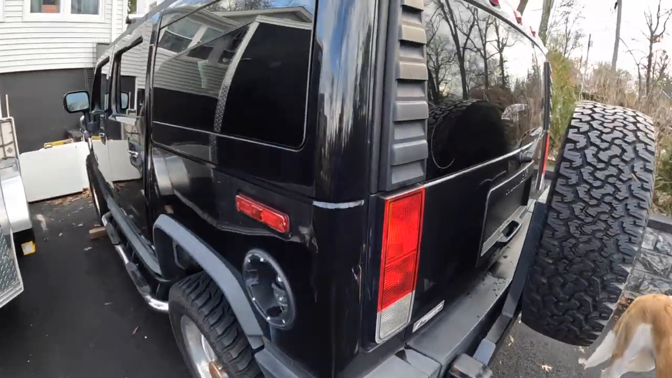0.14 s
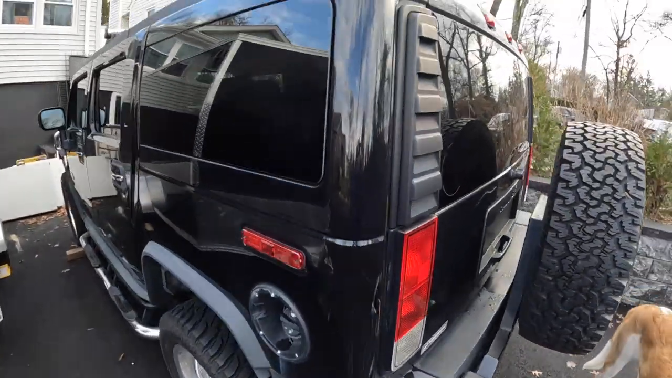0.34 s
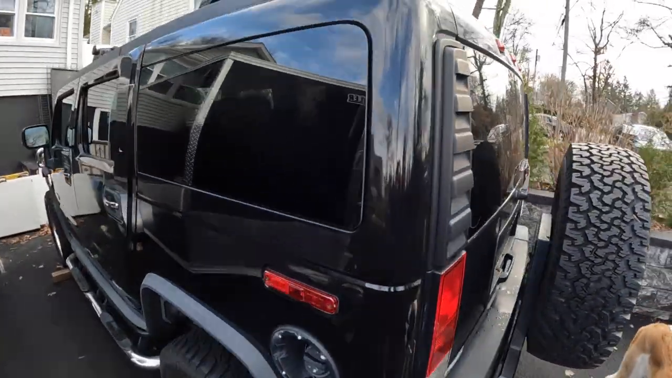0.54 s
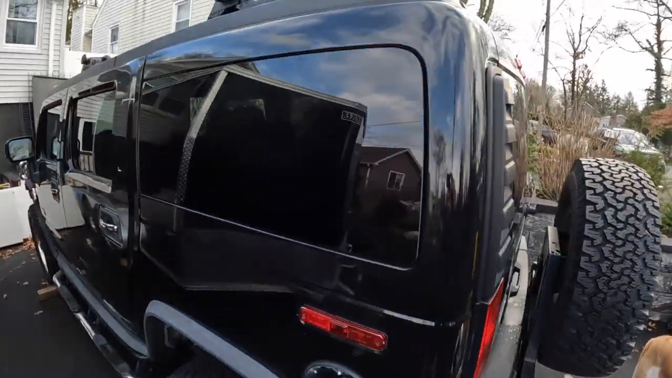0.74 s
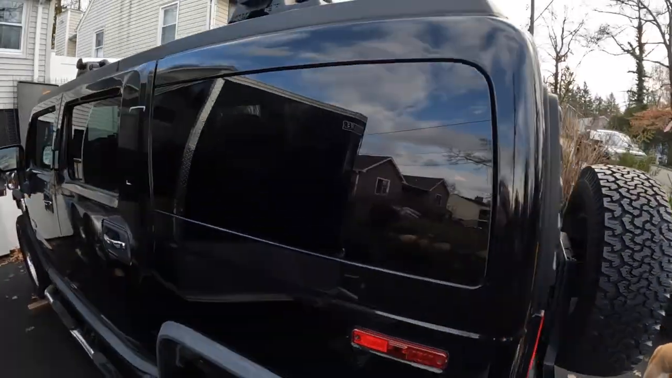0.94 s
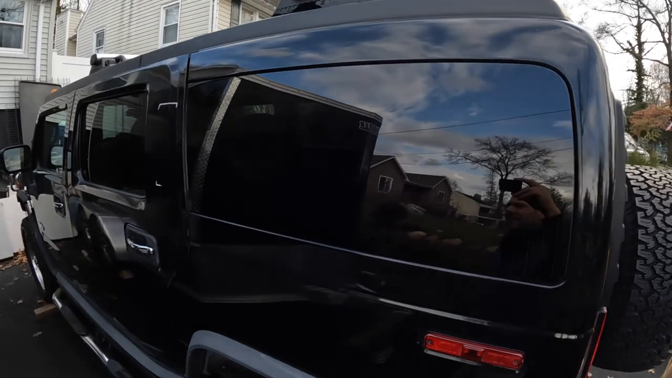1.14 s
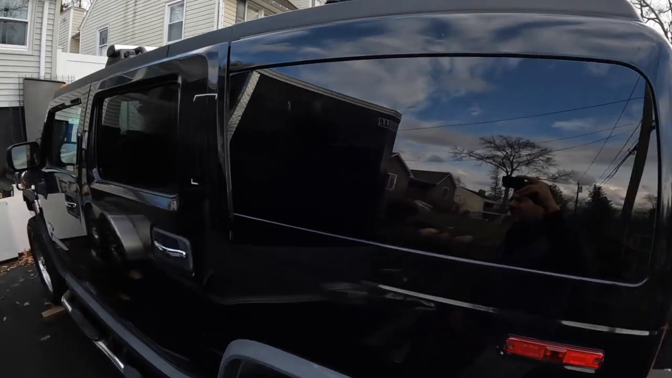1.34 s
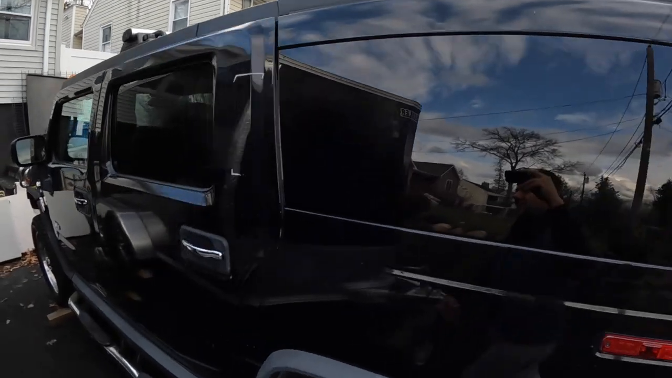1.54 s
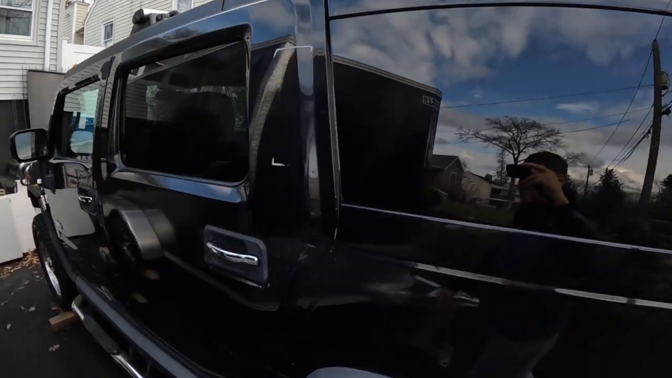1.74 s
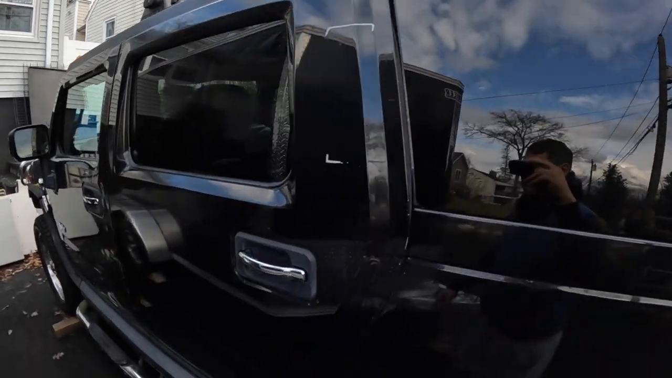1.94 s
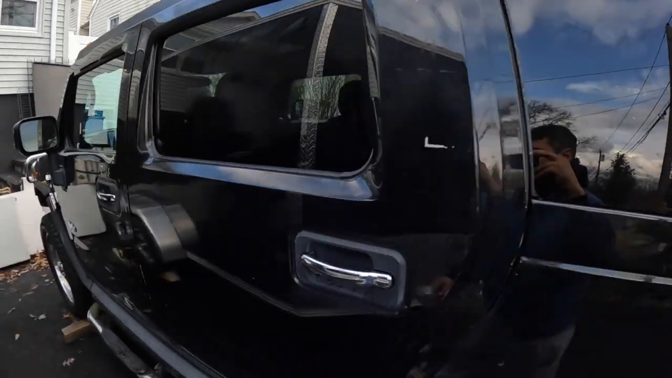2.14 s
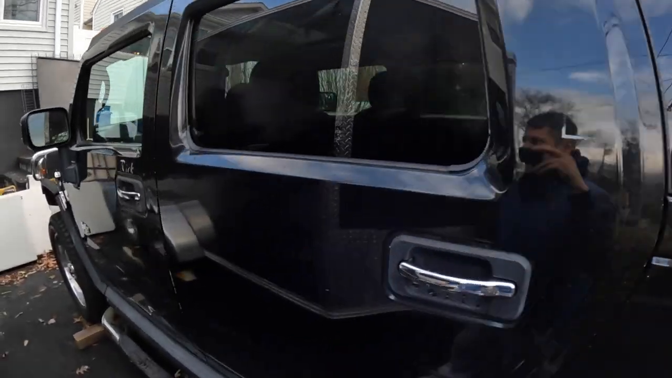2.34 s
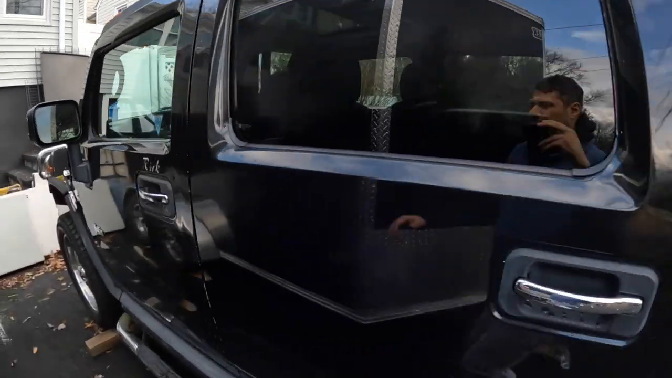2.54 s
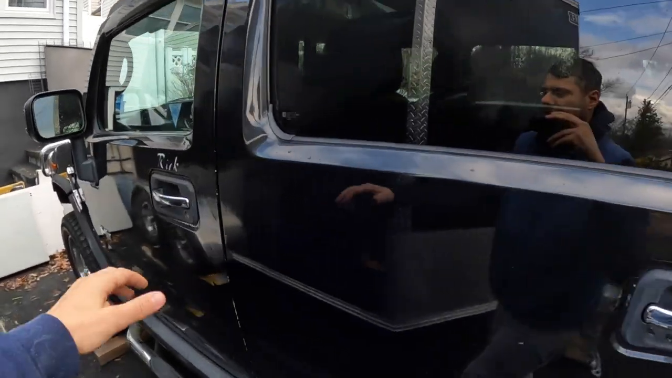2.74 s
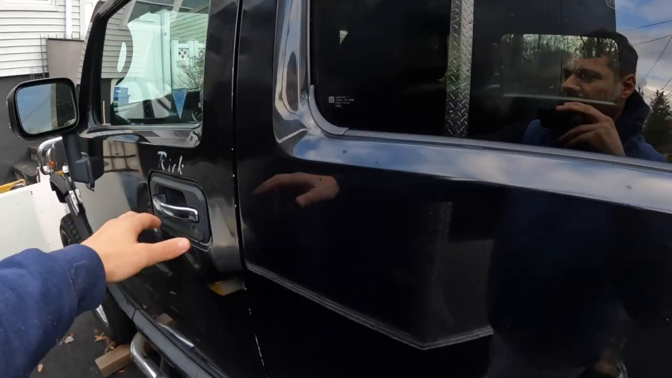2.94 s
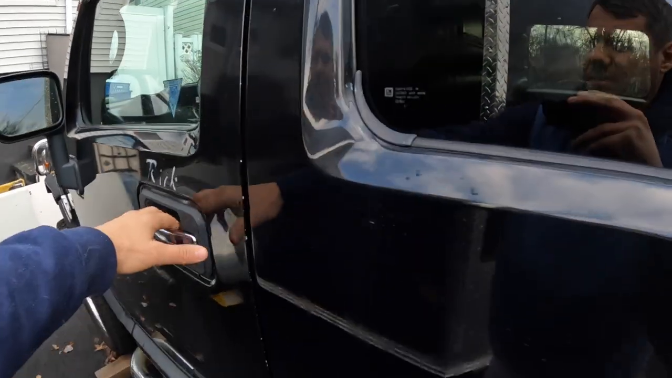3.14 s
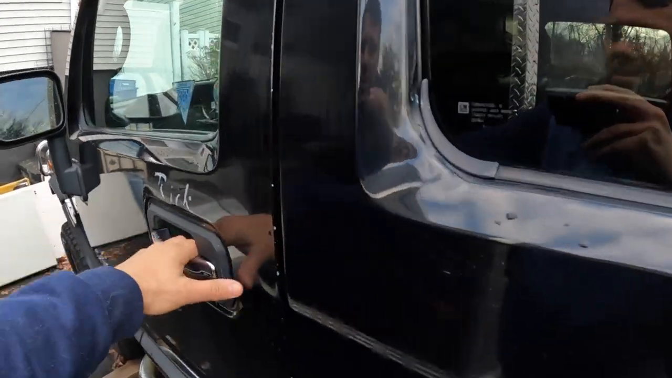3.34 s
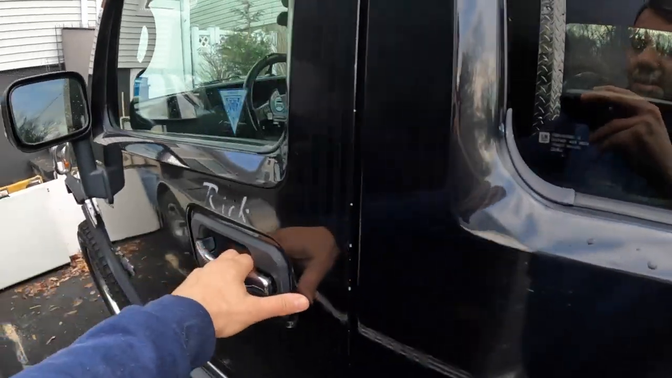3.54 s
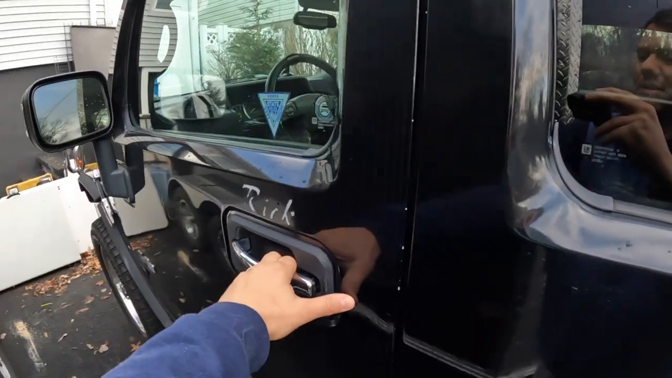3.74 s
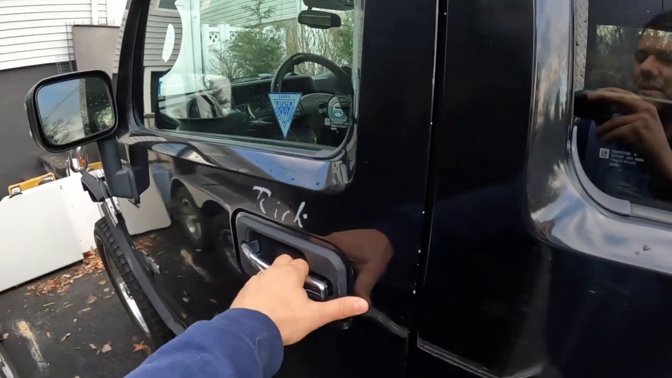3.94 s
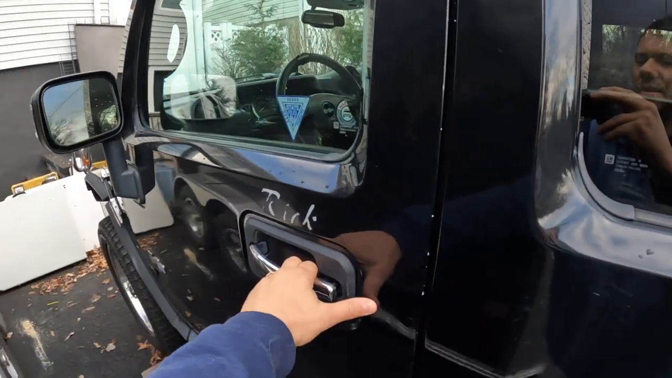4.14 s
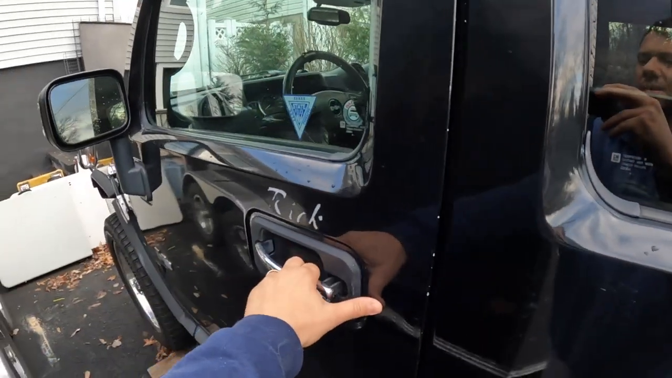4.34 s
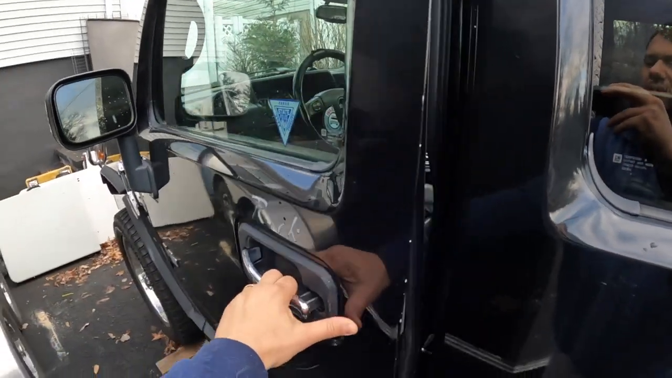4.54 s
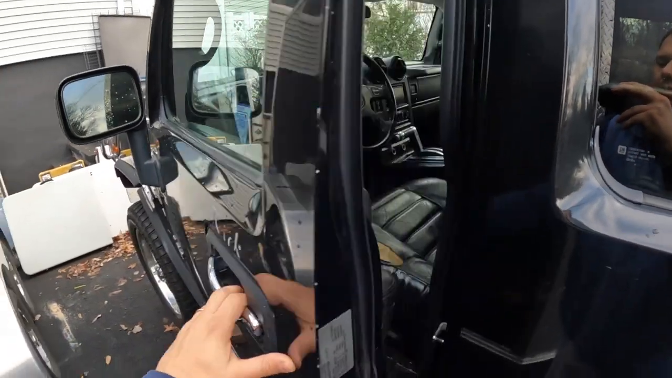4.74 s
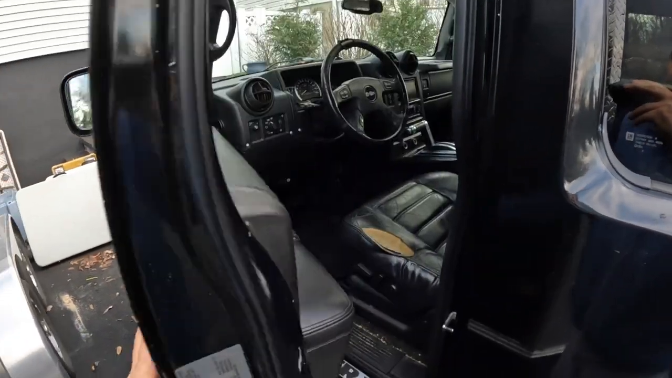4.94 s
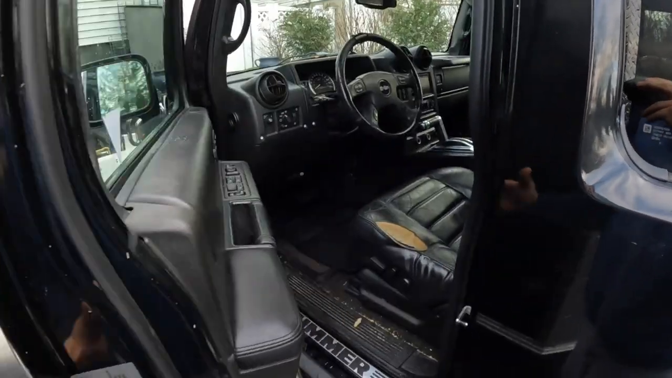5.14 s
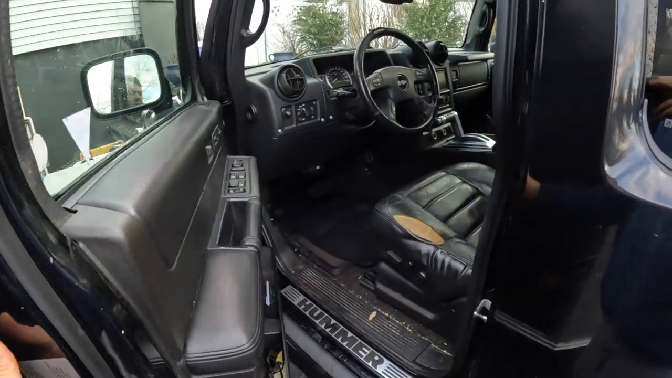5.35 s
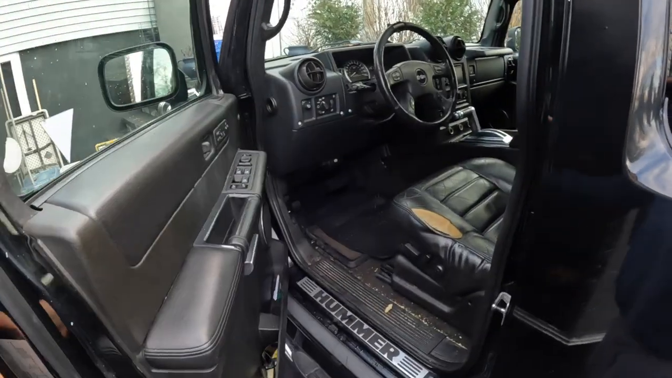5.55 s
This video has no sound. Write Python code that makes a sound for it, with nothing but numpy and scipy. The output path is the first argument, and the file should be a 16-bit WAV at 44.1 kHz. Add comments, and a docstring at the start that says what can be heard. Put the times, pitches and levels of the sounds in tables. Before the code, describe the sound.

Shoes scuff over a gritty driveway before a heavy car door opens with a dull clunk, a sharp latch clunk and a light knock.

```python
"""The door of a heavy off-road vehicle opens after a short walk over a gritty driveway.
Soles scuff, stones snap and a sleeve rustles, over outdoor rumble, far traffic and a brief, faint hum.
The handle is pulled against its stop with a dull clunk, the latch lets go with a sharp one, the door
booms as it leaves its seal, and the door check knocks into its notch as it swings open.
Knocks ring decaying modes and noise bands; rubbing is coloured noise that swells with each stroke."""
import sys
import numpy as np
from scipy import signal
from scipy.io import wavfile

SR = 44100
rng = np.random.default_rng(int(sys.argv[2]) if len(sys.argv) > 2 else 0)


def wav_out(sig):
    """Save sig, one row per channel (or a flat mono array), as 16-bit PCM at SR to the path in sys.argv[1]."""
    wavfile.write(sys.argv[1], SR, np.round(np.clip(np.atleast_2d(sig).T, -1, 1) * 32767).astype(np.int16))


N = 246166
TIME = np.arange(N) / SR
RING_SAMPLES = 26000
RING_TIME = TIME[:RING_SAMPLES]

# arm swings, which pace the jacket and the fine grit: (fastest moment [s], level [dB], half length [s])
ARM_SWINGS = [(0.04, -68, 0.17), (0.41, -66, .13), (1.03, -65, 0.28), (1.34, -63.5, .085),
              (1.77, -69.5, 0.1), (2.4, -68, .22), (2.86, -62, 0.3), (3.36, -73, 0.041),
              (3.5, -61.5, 0.026), (3.62, -67.5, 0.087), (3.86, -80, 0.093), (4.39, -58.5, 0.034),
              (4.85, -59, 0.1), (5.14, -66, 0.14)]


def from_db(db):
    """Decibels to gain."""
    return 10 ** (np.asarray(db) / 20)


def rms_one(x):
    """Scale to unit rms."""
    return x / np.sqrt(np.mean(x ** 2) + 1e-20)


def in_time(rows):
    """Each column of a curve at every sample."""
    s, *columns = np.transpose(rows)
    return [np.interp(TIME, s, c) for c in columns]


def at_hz(rows, hz):
    """Each column of a spectrum at one frequency."""
    freqs, *columns = np.transpose(rows)
    return [np.interp(np.log(hz), np.log(freqs), c) for c in columns]


def add(out, s, sound):
    """Mix a short sound in at time s."""
    start = max(round(s * SR), 0)
    part = sound[..., :max(N - start, 0)]
    out[..., start:start + part.shape[-1]] += part


def soften(x, hz):
    """Two-pole low-pass."""
    return signal.sosfilt(signal.butter(2, min(hz, SR * .45), fs=SR, output="sos"), x + 1e-18)


def thin(x, hz):
    """Two-pole high-pass."""
    sos = signal.butter(2, np.clip(hz, 15, SR * .45), "high", fs=SR, output="sos")
    return signal.sosfilt(sos, x + 1e-18)


def noise_bands(size):
    """Yield (centre Hz, stereo noise) in narrow bands, centred in the bass and wider in the treble."""
    # stereo image: (frequency [Hz], left-right correlation [0-1])
    likeness = [(30, 0.9), (70, 1), (120, 1), (400, 0.96), (1000, 0.77), (3000, 0.59), (7000, 0.78),
                (13000, 0.3)]
    # stereo lean: (frequency [Hz], left minus right [dB])
    balance = [(100, -0.65), (400, 1), (1300, 1.6), (2500, 1), (5000, 0.1), (9000, 1), (13000, 7)]
    edges = [*np.geomspace(18, 4000, 21), 5000, 6400, 8000, 9700, 11500, 13100, 16000]
    white = rng.standard_normal((2, 2, size + 8000))
    sides = np.array([[1], [-1]])
    for k, (low, high) in enumerate(zip(edges, edges[1:])):
        bandpass = signal.butter(3, [low, high], "band", fs=SR, output="sos")
        mid, side = signal.sosfilt(bandpass, white[k % 2])[:, -size:]
        hz = np.sqrt(low * high)
        alike = np.clip(at_hz(likeness, hz)[0], 0, 1)
        pair = np.sqrt(1 + alike) * mid + np.sqrt(1 - alike) * side * sides
        yield hz, rms_one(pair) * from_db(sides * at_hz(balance, hz)[0] / 2)


def coloured(bands, spectrum):
    """Noise bands summed to the shape of a spectrum, at unit rms."""
    return rms_one(sum(band * np.sqrt(hz) * from_db(at_hz(spectrum, hz)[0]) for hz, band in bands))


def strokes(rows):
    """Envelope of a rub that speeds up and slows down in each stroke; strokes add in power."""
    powers = (from_db(db) ** 2 * np.exp(-2 * ((TIME - s) / half_s) ** 2) for s, db, half_s in rows)
    return np.sqrt(sum(powers))


def damped(hz, t60):
    """One mode ringing down from height 1."""
    return np.sin(2 * np.pi * hz * RING_TIME) * from_db(-60 * RING_TIME / t60)


def modes(table):
    """The clear tones of a struck part."""
    return sum(from_db(db) * damped(hz, t60) for hz, db, t60 in table)


def dense_ring(table, crack_db, crack_s, tail_db, tail_t60):
    """A part with countless modes: a brief crack, a ring dying band by band, a faint tail from the yard."""
    crack = from_db(crack_db) * np.exp(-RING_TIME / crack_s)
    tail = from_db(tail_db) * from_db(-60 * RING_TIME / tail_t60)
    out = 0
    for hz, band in noise_bands(RING_SAMPLES):
        level_db, t60 = at_hz(table, hz)
        radiated = min(hz / table[0][0], 1) ** 2   # a part radiates little below its lowest modes
        decay = from_db(-60 * RING_TIME / t60)
        out = out + band * radiated * from_db(level_db) * (decay + crack + tail)
    return out


def struck(knocks, ring, rise_s, light_tap_hz=0):
    """Knocks ring one part: soft contacts lose treble, and light taps lose bass up to light_tap_hz."""
    out = np.zeros((2, N))
    onset = 1 - np.exp(-(RING_TIME / rise_s) ** 2)
    hardest_db = max(db for s, db, contact_hz in knocks)
    for s, db, contact_hz in knocks:
        lightness = (1 - from_db(db - hardest_db)) ** 4
        knock = soften(ring * onset, contact_hz)
        add(out, s, from_db(db) * thin(knock, light_tap_hz * lightness))
    return out


def outdoors(bands, rumble_gain_db, traffic_gain_db):
    """A bed of low rumble and the wash of distant traffic."""
    # drift of the bed, ahead of the two gains: (time [s], rumble [dB], traffic [dB])
    drift = [(0.0, -40.5, -52), (2.59, -39.5, -51), (3.59, -37.5, -54.5), (3.9, -40, -54.5),
             (4.66, -39, -52.5), (5.28, -41.5, -55.5), (5.58, -42, -52.5)]
    # colour of the rumble: (frequency [Hz], relative density [dB])
    rumble_colour = [(11, -30), (18, 2.5), (66, 0), (118, -5), (145, -5), (177, -9), (206, -7.5),
                     (365, -22.5), (400, -42), (520, -46.5), (880, -120)]
    # colour of the traffic: (frequency [Hz], relative density [dB])
    traffic_colour = [(250, -16), (380, 3.5), (600, -1), (800, -1.5), (1050, -2), (1500, -11.5),
                      (2200, -27.5), (3500, -37.5), (7000, -35), (13000, -54.5)]
    rumble_db, traffic_db = in_time(drift)
    rumble = from_db(rumble_db + rumble_gain_db) * coloured(bands, rumble_colour)
    traffic = from_db(traffic_db + traffic_gain_db) * coloured(bands, traffic_colour)
    return rumble + traffic


def hum(hz, level_db, half_level_s):
    """A faint, slightly wavering tone from down the street that soon dies away."""
    waver = rms_one(soften(rng.standard_normal(N), 19))
    pitch_hz = hz * (1 + 0.0085 * waver)
    fade = 1 / (1 + (TIME / half_level_s) ** 6)
    return from_db(level_db) * fade * np.sin(2 * np.pi * np.cumsum(pitch_hz) / SR)


def jacket(bands, creases_per_s, crease_db, crease_s):
    """Cloth hisses softly with each swing of an arm, with tiny ticks where it creases."""
    # colour of rubbing cloth: (frequency [Hz], relative density [dB])
    cloth = [(1200, 0), (2500, 4.5), (4000, 0), (7200, -5.5), (8800, -20.5), (10600, -13.5), (12300, -14),
             (14500, -34)]
    creases = (rng.random(N) < creases_per_s / SR) * rng.random(N)
    ticks = from_db(crease_db) * signal.lfilter([1], [1, -np.exp(-1 / (crease_s * SR))], creases + 1e-18)
    return strokes(ARM_SWINGS) * (1 + ticks) * coloured(bands, cloth)


def grit(fine_peak_per_s, fine_db, fine_spread_db, fine_low_cut_hz, walk_end_s):
    """Small stones crack under the shoes; the smaller the stone, the higher its snap."""
    # single stones snapping: (time [s], gain [dB], low cut [Hz])
    stones = [(0.067, -28, 2480), (0.194, -23, 9200), (0.253, -22.5, 7000), (0.796, -27, 3500),
              (0.854, -28.5, 2980), (1.069, -25.5, 5000), (2.253, -22.5, 2000), (2.8838, -2.5, 2200),
              (3.174, -23.5, 1960), (3.193, -45, 1520), (3.994, -41, 1970)]
    # ring of a stone: (frequency [Hz], band level [dB], t60 [s])
    stone_ring = [(1020, -87, .08), (2370, -46, 0.089), (3700, -41.5, 0.12), (5100, -40.5, 0.13),
                  (7600, -41, 0.099), (8640, -58.5, 0.16), (12200, -68, 0.083), (14400, -84, .06)]
    snap = dense_ring(stone_ring, crack_db=15.5, crack_s=0.0012, tail_db=-9.5, tail_t60=0.18)
    out = np.zeros((2, N))
    for s, db, low_cut_hz in stones:
        add(out, s, from_db(db) * thin(snap, low_cut_hz))
    # finer grit crackles at random as the weight shifts, in time with the arms
    effort = strokes(ARM_SWINGS) * (TIME < walk_end_s)
    cracks = rng.random(N) < fine_peak_per_s / SR * effort / effort.max()
    strengths = from_db(fine_db + fine_spread_db * rng.standard_normal(N))
    crackle = signal.fftconvolve([cracks * strengths], thin(snap, fine_low_cut_hz))[:, :N]
    return out + crackle


def scuffs(bands, grain_db, echo_db, echo_s, bounce_db):
    """A sliding sole swells and fades in millisecond grains; house and car throw a little back."""
    # slides of a sole: (peak time [s], gain [dB], swell and fade [s], high cut [Hz])
    slides = [(0.407, -47.5, 0.0092, 7840), (0.471, -48, 0.016, 5000), (0.544, -49, .019, 6860),
              (0.887, -28.5, 0.0026, 8260), (0.897, -33.5, .003, 8200), (0.91, -42, 0.0091, 6000),
              (0.981, -35, .008, 2750), (0.997, -33.5, 0.012, 10000), (1.36, -60, 0.12, 3040),
              (1.685, -42, 0.0062, 12200), (1.725, -53.5, 0.021, 5940), (1.839, -53.5, 0.02, 3500),
              (2.172, -49.5, 0.0074, 3970), (2.261, -45.5, 0.011, 7300), (2.383, -44, 0.0081, 8950),
              (2.489, -44, .012, 2770), (3.118, -33, 0.0021, 3160), (5.169, -49.5, 0.0075, 3470)]
    # colour of scraped asphalt: (frequency [Hz], relative density [dB])
    asphalt = [(500, 6), (850, 2), (1250, 6), (1800, 0.5), (2400, 6), (3200, 1.5), (4200, 0), (7200, -3.5),
               (8800, -16), (12300, -12.5), (14500, -33)]
    roughness = np.clip(rng.standard_normal(N // 40 + 1), -2, 2)
    grains = np.repeat(from_db(grain_db * roughness), 40)[:N]
    scrape = rms_one(coloured(bands, asphalt) * grains)
    lags_s = rng.uniform(.0008, .003, len(slides))
    out = np.zeros((2, N))
    for (s, db, fade_s, high_cut_hz), lag_s in zip(slides, lags_s):
        near = np.abs(TIME - s) < .3
        t = TIME[near] - s
        echo = from_db(echo_db) * (t > 0) * np.exp(-abs(t) / echo_s)
        stroke = scrape[:, near] * (np.exp(-abs(t) / fade_s) + echo)
        # a bounce off the car's side colours each step differently
        bounce = from_db(bounce_db) * np.roll(stroke, round(lag_s * SR), axis=1)
        out[:, near] += from_db(db) * soften(stroke + bounce, high_cut_hz)
    return out


def footfalls():
    """Heel and toe land on stone with a short, hard tap."""
    # landings: (time [s], gain [dB], contact high cut [Hz])
    landings = [(0.8888, -5, 4000), (0.8958, 5.5, 2500), (0.9863, -17, 5000), (0.9965, -18, 5000),
                (1.681, -14, 3980), (3.115, -13.5, 3900)]
    # tones of a sole on stone: (frequency [Hz], level [dB], t60 [s])
    sole_modes = [(1086, -42.5, 0.17), (1190, -19.5, 0.017), (1507, -33, 0.095), (2060, -38, 0.025),
                  (2800, -44, .05), (3500, -25.5, 0.033)]
    return struck(landings, modes(sole_modes), rise_s=0.00093)


def door_shell(reach_octaves, rise_s):
    """The door booms: a shove drives the panel modes whose period is near its own length."""
    # shoves that flex the door: (time [s], gain [dB], centre frequency [Hz])
    shoves = [(3.501, -23.5, 257), (3.645, -25, 277), (4.3754, -7, 47.8), (4.3762, -17, 221),
              (4.3837, -13, 277), (4.405, -18.5, 93), (4.497, -26, 380), (4.708, -25, 225),
              (4.728, -22.5, 88.5), (4.731, -18.5, 524), (4.7495, -17.5, 645), (4.7695, -14.5, 207),
              (4.787, -17.5, 79.5), (4.865, -17.5, 148), (5.4708, -25, 100)]
    # tones of the door panels: (frequency [Hz], level [dB], t60 [s])
    panel_modes = [(53.1, -3, 0.31), (80.3, 3.5, 0.16), (105.3, -5.5, 0.5), (168, -13, .2),
                   (194, -5.5, 0.26), (212.2, -0.5, 0.16), (267.3, -6.5, 0.093), (303.6, -2.5, 0.029),
                   (328, -5.5, 0.11), (401, 1, 0.091), (420, -20, 0.13), (511, -0.5, 0.13), (546, 6, 0.054),
                   (646, -2, 0.085)]
    out = np.zeros(N)
    hardest_db = max(db for s, db, centre_hz in shoves)
    for s, db, centre_hz in shoves:
        build_s = rise_s * from_db(hardest_db - db)   # gentler shoves build more slowly
        onset = 1 - np.exp(-RING_TIME / build_s)
        for hz, mode_db, t60 in panel_modes:
            drive = np.exp(-(np.log2(hz / centre_hz) / reach_octaves) ** 2)
            add(out, s, from_db(db + mode_db) * drive * onset * damped(hz, t60))
    return out


def handle():
    """The pulled handle takes up its slack, hits the stop with a dull clunk and chatters."""
    # handle and rod hitting their stops: (time [s], gain [dB], contact high cut [Hz])
    knocks = [(4.364, -19.5, 1520), (4.3808, -6.5, 1600), (4.3838, 3, 1720), (4.404, -16, 5970),
              (4.424, -20.5, 2000), (4.447, -27, 2510), (4.489, -21.5, 2010)]
    # ring of the handle: (frequency [Hz], band level [dB], t60 [s])
    handle_ring = [(150, -33, 0.39), (330, -30.5, 0.17), (600, -28, 0.12), (746, -33, 0.034),
                   (1100, -26, 0.036), (1450, -28.5, 0.046), (1900, -43.5, 0.072), (2900, -40.5, 0.17),
                   (4000, -50.5, 0.19), (7000, -41.5, 0.084), (12900, -60, .1)]
    clunk = dense_ring(handle_ring, crack_db=4.5, crack_s=0.0017, tail_db=-25.0, tail_t60=0.87)
    return struck(knocks, clunk, rise_s=0.00063)


def rod(bands, grain_db):
    """The latch rod drags in its guide, sticking and slipping a hundred or so times a second."""
    # tugs on the handle: (fastest moment [s], level [dB], half length [s])
    tugs = [(4.425, -48, 0.032), (4.54, -57.5, 0.065), (4.635, -56.5, 0.041)]
    # colour of the dragging rod: (frequency [Hz], relative density [dB])
    rasp = [(700, -0.5), (1500, 8.5), (2200, 4), (2900, 2), (3600, -12.5), (6000, -17), (13000, -35)]
    slips = rms_one(soften(rng.standard_normal(N), 120))
    return strokes(tugs) * from_db(grain_db * slips) * coloured(bands, rasp)


def latch():
    """The pawl slips, then the steel claw springs round and rattles off the striker."""
    # hits of pawl and claw: (time [s], gain [dB], contact high cut [Hz])
    knocks = [(4.7015, -17, 6960), (4.713, -14.5, 2000), (4.7285, -3, 4500), (4.7318, -3.5, 4100),
              (4.7393, -7, 6040), (4.7423, 3.5, 14700), (4.7495, -7.5, 5500), (4.768, -14, 6000),
              (4.867, -24.5, 7100), (4.914, -41, 5000)]
    # ring of the latch: (frequency [Hz], band level [dB], t60 [s])
    latch_ring = [(150, -37.5, 0.63), (352, -31.5, 0.28), (647, -31.5, 0.22), (1040, -32.5, 0.19),
                  (1990, -37.5, 0.17), (3630, -34.5, 0.14), (5620, -36, .11), (7140, -42.5, 0.13),
                  (8800, -46, 0.091), (10600, -45.5, 0.078), (12400, -41.5, 0.095), (14500, -74, .05)]
    # its clearest tones: (frequency [Hz], relative level [dB], t60 [s])
    latch_modes = [(889, -24, 0.17), (1056, -29.5, 0.18), (1154, -28.5, 0.19), (1410, -42, 0.17),
                   (1578, -22, 0.068), (2355, -46, 0.19), (2767, -47, 0.14), (2970, -36.5, 0.15),
                   (3187, -40, 0.15), (3290, -41.5, 0.13), (3685, -27, 0.1), (3620, -38.5, 0.09),
                   (4930, -41, 0.13), (5580, -36, 0.09)]
    tones = from_db(-1.5) * modes(latch_modes)
    clunk = dense_ring(latch_ring, crack_db=8, crack_s=0.0021, tail_db=-29.5, tail_t60=0.49)
    return struck(knocks, tones + clunk, rise_s=0.00049, light_tap_hz=1190)


def door_check():
    """The sprung roller knocks into the notch of the stay."""
    # hits of the roller: (time [s], gain [dB], contact high cut [Hz])
    knocks = [(5.4625, -29, 3000), (5.4642, 0, 8000), (5.478, -20, 3500), (5.551, -23, 1500)]
    # ring of the stay: (frequency [Hz], band level [dB], t60 [s])
    stay_ring = [(201, -39.5, 0.38), (520, -46, 0.15), (874, -32, 0.073), (1240, -49, 0.15),
                 (1900, -42.5, 0.06), (2720, -44, 0.13), (3700, -61, 0.099), (5660, -49, 0.097),
                 (7520, -52.5, 0.065), (10000, -62, 0.058), (13000, -54, 0.046)]
    # its clearest tones: (frequency [Hz], relative level [dB], t60 [s])
    stay_modes = [(541, -33.5, 0.093), (660, -29, 0.079), (878, -15.5, 0.023), (969, -23.5, 0.056),
                  (1050, -40.5, 0.1), (1835, -43, 0.095), (2694, -40, 0.059), (2700, -62, .12),
                  (5300, -42, 0.041)]
    tones = from_db(1.5) * modes(stay_modes)
    clack = dense_ring(stay_ring, crack_db=5.5, crack_s=0.0024, tail_db=-44, tail_t60=.5)
    return struck(knocks, tones + clack, rise_s=0.0022)


def scene():
    """The walk, then the door, over a bed of open air."""
    air, friction = list(noise_bands(N)), list(noise_bands(N))
    shoes = scuffs(friction, grain_db=6.5, echo_db=-19, echo_s=0.041, bounce_db=-0.5) + footfalls()
    walk = shoes * from_db([[.4], [-1.6]])   # a little to the left
    walk += grit(fine_peak_per_s=14, fine_db=-37, fine_spread_db=2, fine_low_cut_hz=2400, walk_end_s=3.25)
    walk += jacket(air, creases_per_s=9, crease_db=11.5, crease_s=0.0065)
    boom = door_shell(reach_octaves=0.36, rise_s=0.00026)
    hardware = handle() + rod(friction, grain_db=2.5) + latch() + door_check()
    bed = outdoors(air, rumble_gain_db=1.0, traffic_gain_db=1.5)
    bed += hum(hz=356.6, level_db=-48.5, half_level_s=0.39)
    return walk + boom + hardware + bed


def record(dry):
    """A steep low-pass cuts the top above 15.3 kHz."""
    return signal.sosfilt(signal.ellip(10, .1, 80, 15300, fs=SR, output="sos"), dry)


dry = scene()
out = record(dry)
wav_out(out)
```